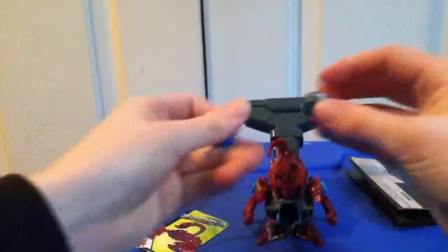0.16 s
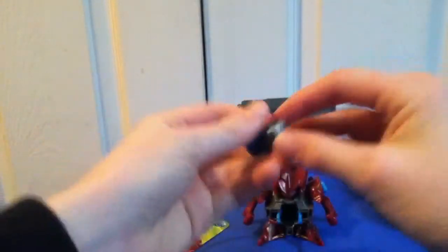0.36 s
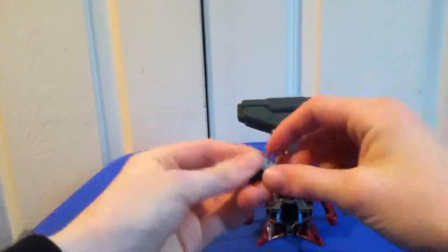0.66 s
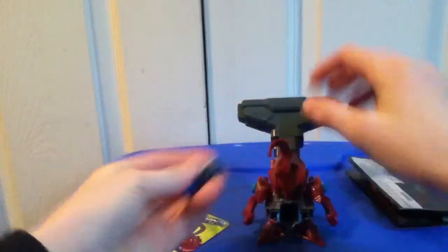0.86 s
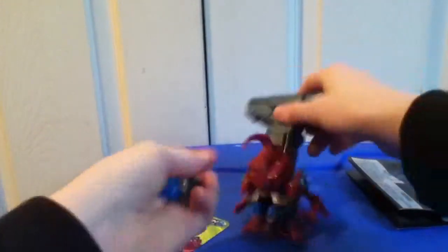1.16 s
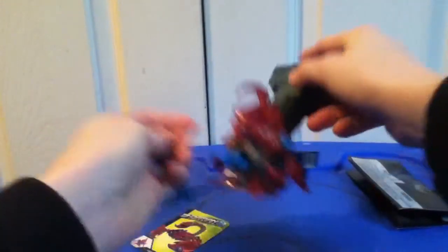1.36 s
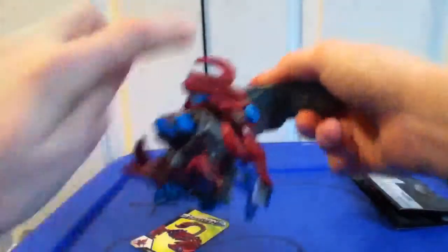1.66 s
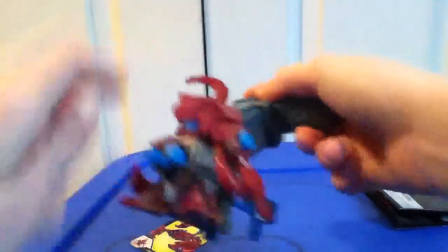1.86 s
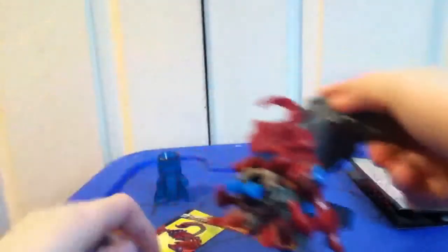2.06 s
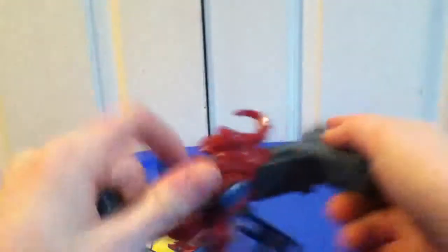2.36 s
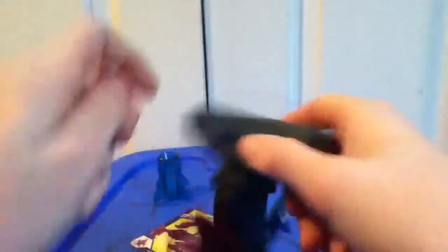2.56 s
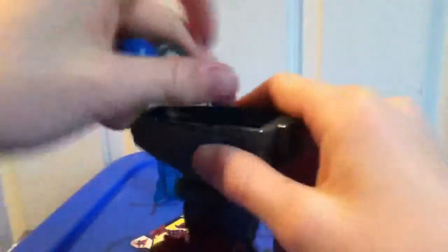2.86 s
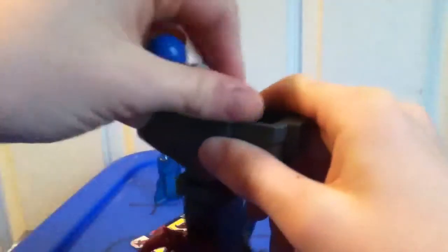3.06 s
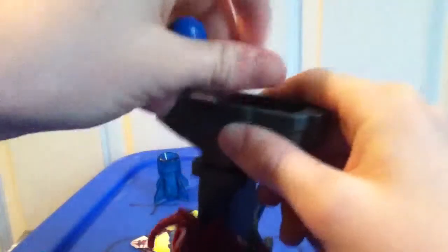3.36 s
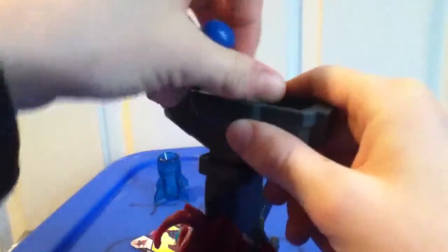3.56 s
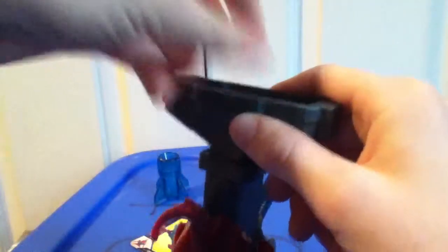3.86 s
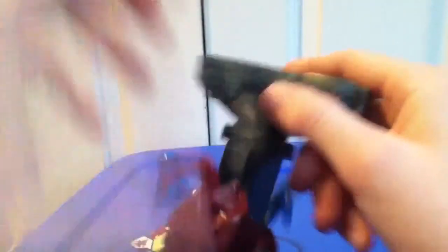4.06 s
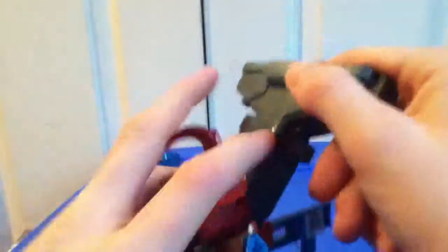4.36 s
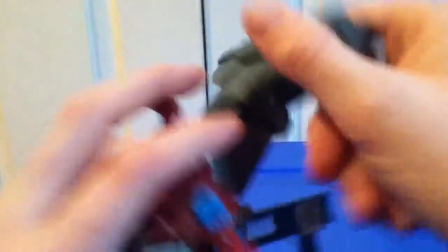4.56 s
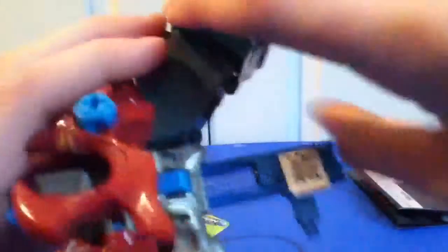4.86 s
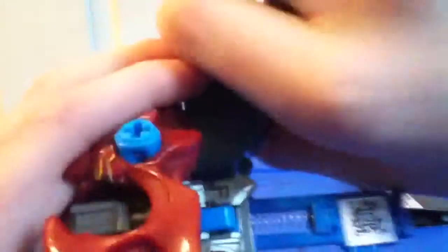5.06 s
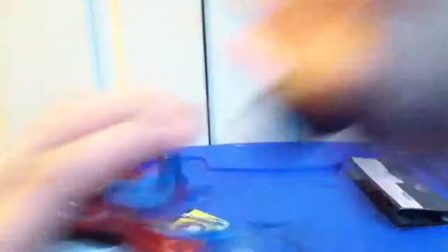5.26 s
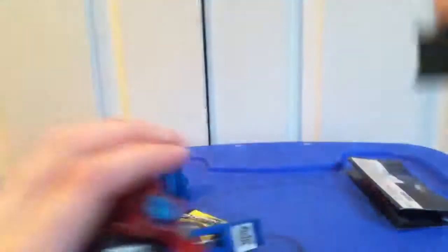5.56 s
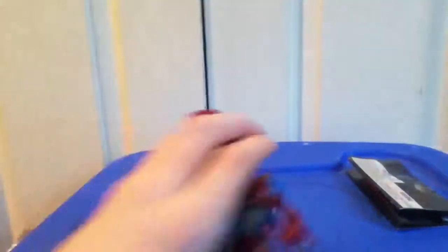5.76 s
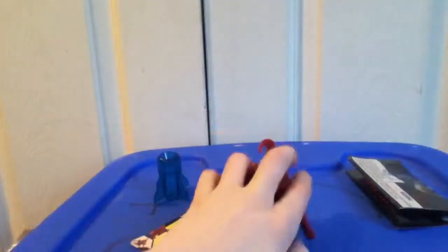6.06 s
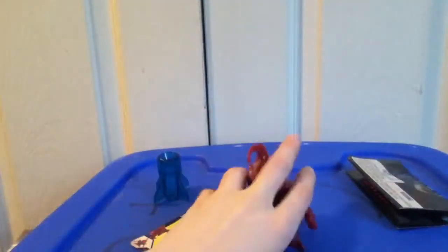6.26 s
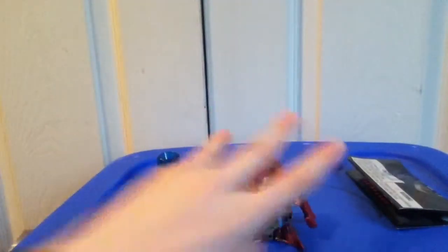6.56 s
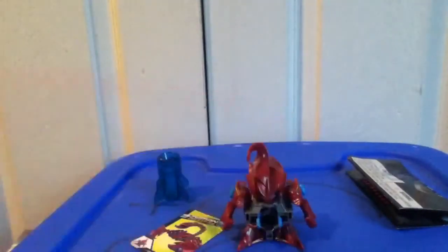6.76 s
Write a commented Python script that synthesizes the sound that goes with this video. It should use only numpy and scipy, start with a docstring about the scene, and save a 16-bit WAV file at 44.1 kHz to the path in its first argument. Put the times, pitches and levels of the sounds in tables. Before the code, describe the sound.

Close, dry recording of hard plastic: quiet fumbling and small rattles, then a burst of very loud ratcheting snaps from a stiff joint, followed by hollow clicks and soft rubbing. A bright pop and chatter mark the handle coming free. Finally two low, hollow knocks with a short scrape set the figure on a tub lid. A fan rushes and hums softly throughout the small room.

```python
"""Plastic toy on a tub lid

Hands work a plastic toy figure and its hollow handle close to a small microphone: stiff parts tick,
ratchet and snap free, each contact a filtered noise crack with a rattle and a ringing shell.
The figure is dragged off a plastic tub lid (hissing slips), then stood on it again with two hollow knocks.
Small room, fan humming behind as coloured noise and tones; the gain ducks at loud snaps and creeps back."""
import sys
import numpy as np
from scipy import signal
from scipy.fft import rfft, irfft, next_fast_len
from scipy.io import wavfile
from scipy.ndimage import uniform_filter1d, minimum_filter1d, map_coordinates

SR = 44100
rng = np.random.default_rng(int(sys.argv[2]) if len(sys.argv) > 2 else 0)


def master_out(mix):
    """Clip the mix to full scale and print it as 16-bit PCM to the path in sys.argv[1]."""
    frames = np.transpose(np.atleast_2d(mix))
    ceiling = np.clip(frames, -1, 1)
    pcm = np.round(ceiling * 32767).astype(np.int16)
    wavfile.write(sys.argv[1], SR, pcm)


N = 305155

# Distinct plastic contacts, close to the microphone: the figure is gripped and lifted by its handle,
# its limbs tick as it is turned over (from 2.3 s), a stiff joint ratchets (3.2 to 4.0 s), the figure
# swings on the handle and changes hands, the handle is pulled off and the freed limbs clack (from 5.26 s).
# Columns: t/s, level/dB, t60/s, resonance of the part touched f/Hz, treble level/dB
CONTACTS = [ (.508, -49, .028, 2600, -24), (.716, -50, .003, 2700, 6), (.9986, -34.5, .002, 3140, -24),
            (1.04, -34, 0.0014, 3400, -10), (1.0724, -32.5, .0025, 4500, 9), (1.0885, -42, .006, 4310, -4),
            (1.2935, -25.5, 0.027, 3070, 7.5), (1.3456, -34.5, 0.044, 4470, 8.5),
            (1.5204, -38, .045, 3140, -2.5), (1.5503, -26.5, 0.054, 2350, 1.5),
            (2.331, -39.5, .022, 3710, 8), (2.438, -41.5, .022, 2760, 13),
            (2.4796, -32.5, 0.062, 2830, 6.5), (2.5386, -37, .055, 2390, -6),
            (2.6092, -37.5, 0.043, 2570, 7.5), (2.7047, -35, 0.045, 2070, -5),
            (2.778, -33.5, .027, 5900, 3.5), (2.86, -40.5, .03, 2290, -15), (2.92, -35, 0.016, 3170, 4),
            (2.9316, -25, .045, 2370, -6), (3.016, -45.5, 0.037, 5860, 9), (3.113, -44.5, 0.034, 3080, 8),
            (3.2468, -8.5, 0.0091, 1900, -3), (3.297, -4.5, .0065, 4960, -8.5),
            (3.315, -15, 0.0097, 5300, -13.5), (3.3444, -7, 0.0087, 1910, 7), (3.3577, -6.5, .009, 2040, 3),
            (3.3694, -12, 0.0078, 2100, -2.5), (3.4098, -29.5, 0.018, 2530, -4.5),
            (3.4337, -3.5, .013, 2450, -2), (3.4404, -5.5, .01, 1970, -2), (3.4455, -8, .017, 2710, 5),
            (3.4552, -13, 0.012, 2600, -13.5), (3.4813, -3, 0.018, 2280, -5),
            (3.526, -15.5, .02, 2230, -2.5), (3.535, -7, .025, 3250, 1), (3.5891, -20, .035, 2510, -2.5),
            (3.615, -23.5, 0.07, 2430, -5), (3.8391, -2.5, 0.006, 5050, -15.5),
            (3.8484, -0.5, .0097, 5240, -8.5), (3.8577, -17, .009, 5340, -8),
            (3.8776, -2, .0063, 2060, 5.5), (3.889, -1.5, 0.0066, 2160, 2), (3.9257, -12, .022, 3590, -10),
            (3.9546, -17.5, 0.01, 3230, 1), (3.9781, -7, .019, 2620, -9.5), (3.9978, -.5, .012, 2950, -2),
            (4.0159, -11, .017, 1010, -7.5), (4.0254, -13.5, 0.023, 2890, -7),
            (4.063, -24.5, 0.036, 1420, -10), (4.0885, -14, 0.05, 1050, -10.5),
            (4.1268, -19, .027, 1040, -9.5), (4.153, -20.5, .026, 1030, -6.5),
            (4.2483, -17.5, .045, 2270, -7), (4.2885, -10.5, 0.022, 1035, -6.5),
            (4.293, -14, .032, 2250, -2.5), (4.446, -21.5, .042, 1940, -13), (4.475, -35, .021, 3960, -5),
            (4.5672, -26, .029, 1350, -22), (4.5926, -17, 0.023, 2100, 5), (4.6038, -13.5, .02, 3300, 13),
            (4.62, -19.5, 0.031, 1320, -3.5), (4.6445, -18.5, 0.024, 1350, -10.5),
            (4.6604, -25, 0.048, 1720, -11), (4.7135, -26, 0.022, 4060, -1),
            (4.7268, -30.5, 0.014, 1397, 8), (4.851, -36.5, 0.042, 1350, 0),
            (4.882, -31.5, 0.021, 5500, -8), (4.8903, -30, .017, 2600, -1), (4.9013, -32, 0.014, 2710, -5),
            (4.936, -30.5, .039, 1340, -4), (4.961, -30.5, .026, 1464, 2), (5.1017, -33, .02, 2800, -5),
            (5.1226, -29.5, 0.041, 1140, -4), (5.1395, -32.5, 0.013, 2730, -5),
            (5.1787, -31.5, 0.022, 2676, 6), (5.232, -40.5, .018, 3650, 1),
            (5.2637, -17.5, .016, 5670, -1.5), (5.3061, -9.5, .015, 2960, 10.5),
            (5.3086, -3, .017, 1350, 9.5), (5.311, -5.5, .021, 4250, 2), (5.3513, -20, 0.021, 3414, 18.5),
            (5.4058, -15, 0.0052, 4560, 3), (5.4317, -18, .0055, 3630, -1),
            (5.4372, -16.5, 0.0072, 3440, -14.5), (5.5002, -18.5, .013, 3840, 8),
            (5.732, -39.5, .025, 2850, -2), (5.799, -39, 0.0091, 2630, 4), (5.92, -37, .015, 1280, -8),
            (5.9333, -33.5, .036, 3650, -1.5), (6.0178, -23, .028, 5160, 6.5), (6.279, -34, .031, 3380, 24),
            (6.519, -50, .019, 3190, -7), (6.729, -46, 0.054, 1990, -4)]


def toy(firm_db=-12, rise_share=0.06, rattle_db=-17, lead_db=-30, lead_s=0.0045):
    """Each contact is a short crack in one small part; loose neighbours rattle and the shell rings on."""
    out = np.zeros(N)
    t = np.arange(SR // 7) / SR
    for contact in list(CONTACTS) + rattles():
        s, db, t60, _, _ = contact
        # 0 for a light touch, 1 for a snap under full grip
        firmness = 1 / (1 + amp(2 * (firm_db - db)))
        # glancing contacts swell more slowly than clean snaps
        rise = rise_share * t60
        # each way of touching wakes a few lesser resonances, and others again in the neighbours
        own, others = rng.uniform(*np.transpose(LESSER_BANDS), (2, len(LESSER_BANDS)))
        crack = sounded(crack_force(t, t60, rise), contact, firmness, own)
        rattle = amp(rattle_db) * sounded(rattle_force(t, rise), contact, firmness, others)
        add(out, s - rise / 2, amp(db) * (crack + rattle + shell(t, contact, firmness)))
        # a firmly pressed part slips a little just before it snaps
        if db > firm_db:
            add(out, s - lead_s, amp(db + lead_db) * crack)
    return out


# Runs of loose parts chattering. Columns: start t/s, length t/s, level/dB, fall over the run level/dB,
# contacts a second, t60/s, resonance f/Hz, treble level/dB
RATTLES = [(1.317, .03, -40, -3, 52, .02, 3180, 1.5), (1.577, .04, -43, 4, 84, 0.021, 2580, -3),
           (2.948, 0.023, -38, 1, 71, 0.028, 2500, -9), (3.381, .02, -27.5, 0, 100, 0.016, 2050, -9),
           (3.491, .035, -18.5, 9, 100, 0.03, 2260, -4), (3.898, .025, -11.5, 1, 120, 0.018, 2060, -7),
           (4.026, .02, -22.5, 3, 78, .015, 2090, -8), (4.172, .025, -25, 8, 81, 0.02, 1080, -17),
           (4.265, .015, -27.5, 0, 60, .023, 1260, 15), (4.307, .07, -17, 16, 84, 0.022, 2360, -4),
           (4.77, 0.35, -41.5, 1.5, 62, .018, 2940, 1), (5.271, .015, -27, 0, 46.7, 0.028, 2750, 9),
           (5.314, .075, -22.5, 11.5, 137, .022, 4800, -2), (5.455, .085, -28.5, 3, 90, .012, 4600, 2)]


def rattles(jitter=0.33, scatter_db=0.5, pitch_spread=0.098):
    """Loose parts bounce at uneven gaps, drifting in level over the run; gives rows like CONTACTS."""
    rows = []
    for start, length, db, fall_db, rate, t60, hz, treble_db in RATTLES:
        gap, size, pitch = rng.standard_normal((3, 32))
        gaps = np.exp(jitter * gap) / rate
        lags = np.cumsum(gaps) - gaps
        for lag, louder, higher in zip(lags, size, pitch):
            if lag < length:
                level_db = db - fall_db * lag / length + scatter_db * louder
                rows.append((start + lag, level_db, t60, hz * np.exp(pitch_spread * higher), treble_db))
    return rows


def chatter(t, rise, t60):
    """Rough surfaces meeting: noise that swells, then decays."""
    return rng.standard_normal(len(t)) * (1 - np.exp(-t / rise)) * fade(t, t60)


def crack_force(t, t60, rise, hit_db=-8):
    """The rubbing of a contact with one sharp hit in it."""
    hit = signal.unit_impulse(len(t), round(rise * SR))
    return unit(chatter(t, rise, t60)) + amp(hit_db) * unit(hit)


def rattle_force(t, rise, t60=0.032, grain=0.69):
    """Neighbouring parts shaken by uneven jolts as they settle."""
    knots = np.linspace(0, t[-1], 100)
    jolts = np.exp(grain * np.interp(t, knots, rng.standard_normal(100)))
    return chatter(t, rise, t60) * jolts


# A contact between two parts, as heard close by. Columns: f/Hz, level/dB per Hz
SNAP = [(60, -31), (200, -15.5), (350, -13.5), (600, -11), (1100, -6), (2000, -3), (3500, -2), (5200, -4.5),
        (6500, -8), (8000, -7.5), (10500, -14), (16000, -31)]
# One lesser resonance falls in each band. Columns: lower f/Hz, upper f/Hz
LESSER_BANDS = [(1000, 1700), (1700, 2900), (2900, 5000), (5000, 8500)]


def sounded(force, contact, firmness, peaks, side_db=6, side_width=0.083):
    """The contact's force heard through the touched part and its lesser resonances."""
    def gain_db(hz):
        lesser = side_db * sum(resonance(hz, peak, side_width) for peak in peaks)
        return along(SNAP, hz) + part_db(hz, contact, firmness) + lesser
    return pulse(coloured(force, gain_db), 1 / 500)


# Fullness of the contacts below 1.4 kHz, greatest while the hollow figure is held near the microphone.
# Columns: t/s, level/dB
FULLNESS = [(1.0, -11), (2.9, -3.5), (3.9, -0.5), (4.1, -1), (4.6, -1.5), (4.77, 23), (4.89, 10),
            (4.94, 20.5), (5.26, 17), (5.31, 3), (6.0, 3)]
# The stiff joint's own resonances, heard in every firm snap. Columns: f/Hz, peak level/dB
JOINT = [(1950, 4.5), (5200, 2.5)]


def part_db(hz, contact, firmness, clean_t60=0.0066, peak_db=13.5, peak_fall_db=1,
            ring_width=0.076, joint_width=0.081):
    """Gain of one plastic part: fullness, treble, joint and one resonance, widths in log frequency."""
    s, _, t60, ring_hz, treble_db = contact
    body = np.interp(s, *np.transpose(FULLNESS)) / (1 + (hz / 1400) ** 4)
    treble = treble_db / (1 + (4500 / (hz + 1)) ** 4)
    joint = firmness * sum(height * resonance(hz, peak, joint_width) for peak, height in JOINT)
    # a short, clean contact singles out one resonance: loss per doubling or halving of its length
    ring_db = max(peak_db - peak_fall_db * abs(np.log2(t60 / clean_t60)), 1)
    # plastic is lossy: a strong resonance has wide skirts, not a sharp tip
    width = ring_width * np.sqrt(ring_db / 10 * max(clean_t60 / t60, 1))
    return body + treble + joint + ring_db * resonance(hz, ring_hz, width)


# The hollow handle that the figure is plugged into. Columns: f/Hz, level/dB, t60/s
HANDLE = [(845, -9, 0.16), (1054, -0.5, 0.075), (1080, -10, 0.18), (1510, -9, 0.18), (1577, -7.5, 0.086),
          (1845, -14, 0.09), (2190, -0.5, 0.17), (2453, -1, 0.13), (2600, -13.5, .2), (2754, 3, 0.086),
          (3370, -3.5, .16), (3590, 1.5, 0.058), (4640, -6.5, 0.11), (7800, -19, 0.082)]
# The figure's thin parts alone. Columns: f/Hz, level/dB, t60/s
FIGURE = [(2580, 1.5, 0.08), (3520, -3.5, 0.057), (5020, -3, 0.1), (6500, -5.5, .12), (8060, -4, 0.072)]


def shell(t, contact, firmness, unplug_s=5.25, follow=0.59, shell_db=-11, grip_db=6, feed_db=2.5):
    """The handle's modes ring until it comes off, then the figure's thin parts."""
    s, _, t60, _, _ = contact
    body = HANDLE if s < unplug_s else FIGURE
    # modes nearest the part's own pitch take up most
    modes = [(hz, db + follow * part_db(hz, contact, firmness), life) for hz, db, life in body]
    # longer contacts feed the shell more; a firm grip damps it
    level_db = shell_db - grip_db * firmness + feed_db * np.log2(t60 / 0.019)
    return amp(level_db) * pulse(ring(modes, t, scatter_db=7), 1 / 500)


# Blows on the tub lid. Columns: t/s, level/dB, t60/s, tick level/dB
KNOCKS = [(0.98, -43, 0.033, 4.5), (1.231, -38, 0.24, 3), (1.258, -37.5, 0.12, -28),
          (1.5316, -49.5, 0.023, 7), (6.1025, -22, 0.16, 1.5), (6.1198, -27, 0.15, -15),
          (6.14, -22, 0.22, -3.5), (6.3281, -22.5, 0.13, 0), (6.3377, -29.5, 0.1, -5),
          (6.3654, -42, 0.11, 11.5)]
# The lid's panel modes. Columns: f/Hz, level/dB, t60/s
LID = [(151, -2.5, 0.23), (209, -3, 0.21), (300, 5, 0.088), (345.3, 5, 0.14), (467, 0, 0.14),
       (640, -1, 0.25), (688, 9.5, 0.033), (741, -15, 0.19), (850, -3.5, 0.11), (983, -6.5, 0.2),
       (1109, -4.5, 0.19), (1500, -19, 0.14)]
# The lid's dense panel sound under a blow. Columns: f/Hz, level/dB per Hz
LID_COLOUR = [(29, -48.5), (50, -3), (153, -0.5), (483, -5), (544, -10.5), (707, -4.5), (778, -6.5),
              (1450, -11), (2020, -16.5), (2390, -13.5), (2690, -19), (8260, -25.5), (15000, -42.5)]


def lid_knocks(modes_db=-2, clatter_db=-0.5, clatter_t60=0.079):
    """Hard feet tick and clatter on the lid and set its many panel modes going."""
    out = np.zeros(N)
    t = np.arange(SR // 2) / SR
    for s, db, t60, tick_db in KNOCKS:
        boom = rng.standard_normal(len(t)) * fade(t, t60)
        panel = pulse(coloured(boom, lambda hz: along(LID_COLOUR, hz)), 1 / 100)
        modes = pulse(ring(LID, t, scatter_db=3.5), 1 / 100)
        tick = foot(signal.unit_impulse(len(t)))
        # the product of three noises: a few hard re-contacts among many light ones
        clatter = foot(rng.standard_normal((3, len(t))).prod(axis=0) * fade(t, clatter_t60))
        blow = panel + amp(modes_db) * modes + amp(tick_db) * tick + amp(clatter_db) * clatter
        add(out, s, amp(db) * blow)
    return out


# A hard foot meeting the lid. Columns: f/Hz, level/dB per Hz
FOOT = [(100, -2), (600, -4.5), (1700, 1.5), (3000, -1.5), (5000, -12.5), (15000, -28)]


def foot(force):
    """A hard foot colours the force with which it meets the lid."""
    return pulse(coloured(force, lambda hz: along(FOOT, hz)), 1 / 500)


# Dull pushes on the lid and pops of the hollow body. Columns: t/s, level/dB, centre f/Hz, t60/s
THUDS = [(.66, -52, 394, 0.053), (.983, -41, 513, 0.017), (2.3004, -47, 1300, 0.016),
         (2.589, -52, 1250, .012), (5.264, -44, 327, 0.05), (5.306, -25, 308, 0.035),
         (6.11, -35, 133, 0.16), (6.15, -32.5, 174, 0.22), (6.337, -27, 135, 0.093), (6.429, -61, 230, .06),
         (6.574, -38, 229, 0.076)]


def thuds(skirt_db=20):
    """Dull pushes only boom: decaying noise in a band falling off with the square of the octave distance."""
    out = np.zeros(N)
    t = np.arange(SR // 2) / SR
    for s, db, centre_hz, t60 in THUDS:
        band = lambda hz: np.maximum(-skirt_db * np.log2((hz + 1) / centre_hz) ** 2, -60)
        push = rng.standard_normal(len(t)) * fade(t, t60)
        add(out, s, amp(db) * pulse(coloured(push, band), 1 / 100))
    return out


# The feet sliding on the lid. Columns: start t/s, length t/s, level/dB
SLIDES = [(.96, 0.13, -51), (1.1, 0.22, -48.5), (6.275, .1, -36), (6.465, 0.013, -48.5)]
# The lid heard under sliding feet. Columns: f/Hz, level/dB per Hz
SCRAPE = [(50, -3), (150, 10.5), (400, 3), (780, -1.5), (1500, -4.5), (3000, -7), (7000, -16),
          (15000, -35.5)]


def dragging():
    """Feet catch and slip densely as they are dragged over the lid."""
    gain = strokes(SLIDES, attack_s=0.015, release_t60=0.092)
    return friction(gain, SCRAPE, slips=1800, smooth_db=-3.5)


# Fingers and parts rubbing, close by. Columns: start t/s, length t/s, level/dB
RUBS = [(1.25, 0.028, -47), (1.5, .11, -60), (2.26, .85, -62.5), (2.925, 0.022, -60), (3.53, 0.019, -37),
        (3.62, 0.03, -56), (3.91, .03, -48.5), (4.08, 0.093, -42), (4.243, 0.03, -49), (4.28, 0.064, -34.5),
        (4.39, .35, -52.5), (4.76, .42, -58), (5.33, 0.198, -44), (5.6, 0.54, -56), (6.02, .03, -51.5),
        (6.2, 0.414, -59.5)]
# Skin and plastic rubbing on the toy. Columns: f/Hz, level/dB per Hz
RUB_COLOUR = [(100, -37), (700, 2), (1100, 1), (1700, -3), (2600, -1), (5000, -5), (9000, -12.5),
              (16000, -36)]


def rubbing():
    """Skin and plastic slip against the toy in soft strokes."""
    gain = strokes(RUBS, attack_s=0.016, release_t60=0.24)
    return friction(gain, RUB_COLOUR, slips=600, smooth_db=-1)


def friction(gain, colour, slips, smooth_db):
    """Tiny slips of uneven size, so many a second, over a smooth hiss, heard through a body."""
    grains = (rng.random(N) < slips / SR) * rng.standard_normal(N)
    force = unit(grains) + amp(smooth_db) * rng.standard_normal(N)
    return gain * unit(coloured(force, lambda hz: along(colour, hz)))


def strokes(rows, attack_s, release_t60):
    """Gain of sliding strokes: each swells, holds for its length and dies away."""
    t = np.arange(N) / SR
    gain = np.zeros(N)
    for s, length, db in rows:
        swell = np.clip(1 + (t - s) / attack_s, 0, 1) ** 2
        gain += amp(db) * swell * fade(np.maximum(t - s - length, 0), release_t60)
    return gain


# The small room's decay. Columns: f/Hz, t60/s
ROOM = [(150, 0.28), (1000, 0.14), (3000, 0.11), (7000, 0.12), (15000, 0.062)]


def room(x, wall_s=0.01, wall_db=-21, tail_db=-15, count=10):
    """A near wall answers first, then a short noise tail that changes as the hands move."""
    out = amp(wall_db) * np.pad(x, round(wall_s * SR))[:N]
    for part in np.array_split(np.arange(N), count):
        # noise whose every band dies at the room's own pace
        hz, t, z = signal.stft(rng.standard_normal(SR // 2), SR, nperseg=256)
        tail = signal.istft(z * fade(t, along(ROOM, hz)[:, None]), SR, nperseg=256)[1]
        tail *= 1 - np.exp(-np.arange(len(tail)) / SR / 0.002)
        add(out, part[0] / SR, amp(tail_db) * signal.fftconvolve(x[part], tail / np.linalg.norm(tail)))
    return out


# Rushing air of the fan and room. Columns: f/Hz, level/dB per Hz
AIR = [(12, -40.5), (20, -7), (48, -26.5), (74, 1), (110, -8.5), (172, 0), (248, -11.5), (328, -11.5),
       (377, -14.5), (513, -18.5), (718, -26.5), (1000, -25), (1810, -29.5), (3740, -30.5), (16000, -36.5)]
# Fan tones, before they waver. Columns: f/Hz, rms level/dB
HUM = [(80.7, -58), (177.6, -63.5), (279.9, -64), (323.0, -67)]


def fan(air_db=-50, waver_db=2, drift_rad=0.5):
    """Low rushing air with a few tones unsteady in level and phase."""
    t = np.arange(N) / SR
    out = amp(air_db) * unit(coloured(rng.standard_normal(N), lambda hz: along(AIR, hz)))
    for hz, db in HUM:
        level = amp(db + waver_db * wobble(5.5)) * np.sqrt(2)
        out += level * np.sin(2 * np.pi * hz * t + drift_rad * wobble(6))
    return out


def amp(db):
    """Decibels to gain."""
    return 10 ** (np.asarray(db) / 20)


def unit(x):
    """Scale to rms 1."""
    return x / np.sqrt(np.mean(x ** 2) + 1e-20)


def pulse(x, seconds):
    """Scale to the energy that rms 1 has over the given time."""
    return x * np.sqrt(seconds * SR / (np.sum(x ** 2) + 1e-20))


def along(points, hz):
    """Read (f/Hz, value) points on a log axis."""
    f, v = np.transpose(points)
    return np.interp(np.log(hz + 1), np.log(f + 1), v)


def resonance(hz, centre_hz, width):
    """A peak of height 1, its half-width at half height in log frequency."""
    return 1 / (1 + (np.log((hz + 1) / centre_hz) / width) ** 2)


def wobble(rate):
    """A smooth random curve, rate knots a second."""
    knots = rng.standard_normal(int(N * rate / SR) + 4)
    return map_coordinates(knots, [np.arange(N) * rate / SR])


def fade(t, t60):
    """Free decay, 60 dB down after t60."""
    return np.exp(-np.log(1000) * t / t60)


def coloured(x, gain_db):
    """Causal (minimum-phase) filter with the given dB as a function of frequency."""
    m = 2 * next_fast_len(len(x) // 2 + 1024)
    # folding the cepstrum onto positive time makes the response causal
    cepstrum = irfft(np.log(amp(gain_db(np.fft.rfftfreq(m, 1 / SR))) + 1e-6), m)
    cepstrum[1:m // 2] *= 2
    cepstrum[m // 2 + 1:] = 0
    return irfft(rfft(x, m) * np.exp(rfft(cepstrum)), m)[:len(x)]


def ring(modes, t, scatter_db):
    """Damped modes, excited at new strengths by each blow."""
    hz, db, t60 = np.transpose(modes)[:, :, None]
    strength = amp(db + scatter_db * rng.standard_normal(hz.shape))
    sign = rng.choice([-1, 1], hz.shape)
    return np.sum(strength * sign * fade(t, t60) * np.sin(2 * np.pi * hz * t), axis=0)


def add(track, s, x):
    """Mix x into the track at time s."""
    start = int(np.clip(round(s * SR), 0, N - 1))
    track[start:start + len(x)] += x[:N - start]


def scene():
    """The toy and the tub lid close by, the room around them and the fan behind."""
    # a small panel radiates almost no deep bass
    bass_cut = [(20, -27), (50, -4.5), (90, -0.5)]
    tub = coloured(lid_knocks() + thuds() + dragging(), lambda hz: along(bass_cut, hz))
    near = toy() + tub + rubbing()
    return (near + room(near) + fan())[None]


def record(dry, ceiling_db=-11, recovery_db=4, size=66, top_hz=15900):
    """The gain drops at once at a loud snap and recovers by a few dB a second; then the band limit."""
    # size in samples: the level is averaged over 1.5 ms
    level_db = 10 * np.log10(np.abs(uniform_filter1d(dry[0] ** 2, size)) + 1e-12)
    ramp = recovery_db * np.arange(N) / SR
    # hold the deepest cut so far, let off at recovery_db a second
    cut_db = np.maximum.accumulate(np.maximum(level_db - ceiling_db, 0) + ramp) - ramp
    held = dry * uniform_filter1d(minimum_filter1d(amp(-cut_db), 2 * size), size)
    # peaks round off towards 0.75 of full scale
    held = held / (1 + np.abs(held / 0.75) ** 6) ** (1 / 6)
    m = next_fast_len(N + SR // 2)
    passed = np.fft.rfftfreq(m, 1 / SR) < top_hz
    return irfft(rfft(held, m) * passed, m)[:, :N]


dry = scene()
out = record(dry)
master_out(out)
```